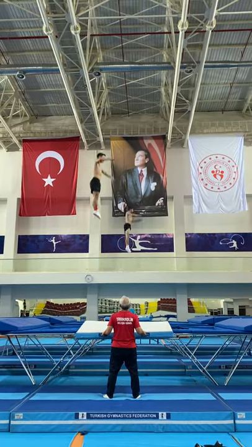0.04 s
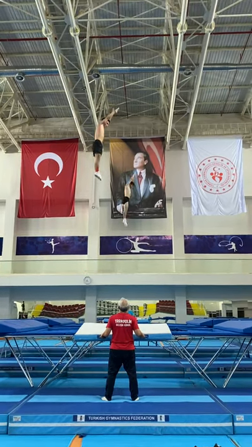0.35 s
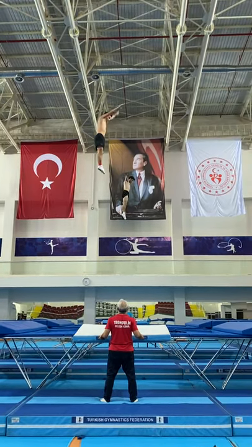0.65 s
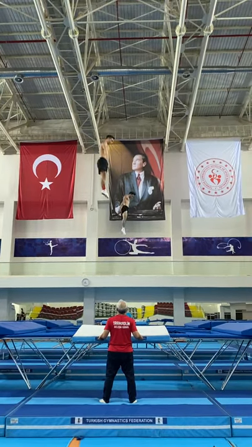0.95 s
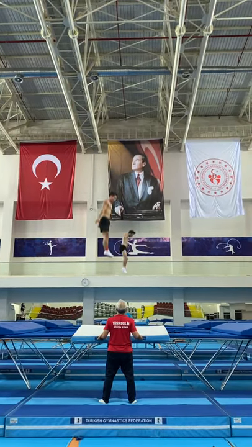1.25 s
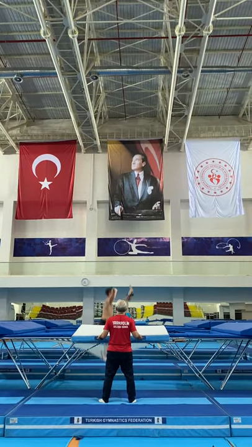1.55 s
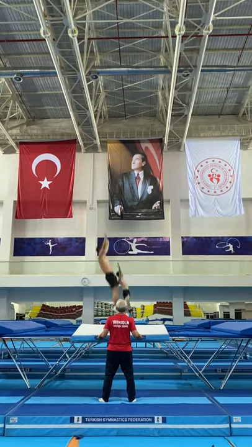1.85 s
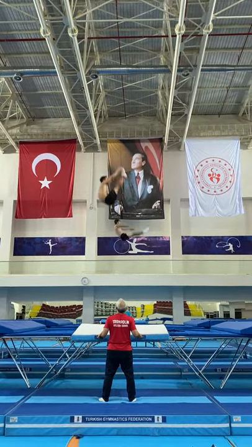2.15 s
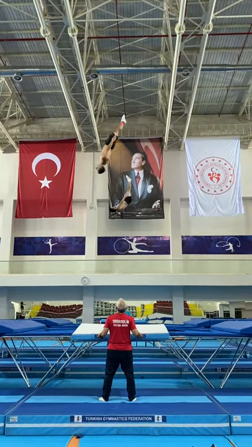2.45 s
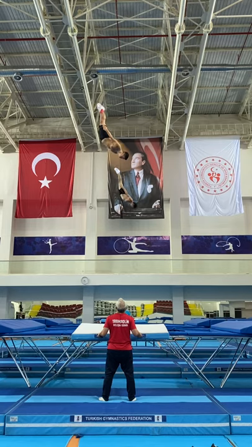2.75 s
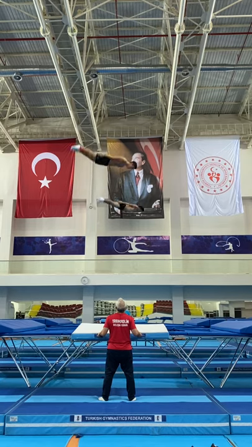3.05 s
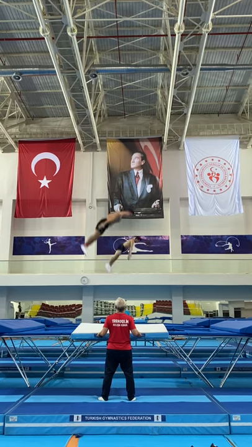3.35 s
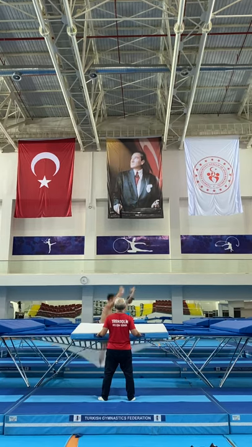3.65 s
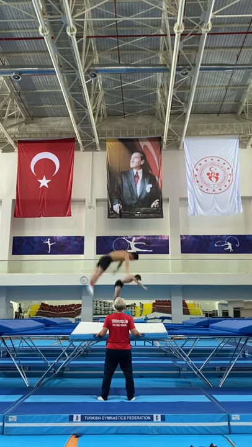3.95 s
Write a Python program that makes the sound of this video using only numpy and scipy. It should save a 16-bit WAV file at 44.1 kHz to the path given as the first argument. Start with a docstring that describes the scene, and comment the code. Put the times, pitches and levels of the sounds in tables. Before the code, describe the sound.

Deep trampoline bounces come about every two seconds, each with dull foot slaps, swishing mesh and jingling springs, while the frame knocks and rings. A large sports hall, heard from a few metres off, echoes over its own steady rumble.

```python
"""Two trampolines in a big sports hall: gymnasts land on them almost together, about every two seconds.
Feet slap down, and each mesh bed thumps, rumbles and swishes through the air. The steel springs creak,
jingle and clank against the frame, which knocks and rings. The hall echoes for seconds over its own
steady rumble. It is all heard in stereo from a few metres away."""
import sys
import numpy as np
from scipy import signal
from scipy.fft import rfft, irfft
from scipy.io import wavfile
from scipy.ndimage import uniform_filter1d

SR = 44100
rng = np.random.default_rng(int(sys.argv[2]) if len(sys.argv) > 2 else 0)


def int16_out(signal):
    """Quantize to a 16-bit WAV file."""
    q = np.round(np.clip(np.atleast_2d(signal).T, -1, 1) * 32767)
    wavfile.write(sys.argv[1], SR, q.astype(np.int16))


N = 176400
LEAD_S = 1  # start early, so the hall is already echoing at time zero
M = N + LEAD_S * SR
T = np.arange(M) / SR - LEAD_S
HZ = np.maximum(np.arange(M // 2 + 1) * SR / M, 1)

# Each landing on a bed: start_s, rumble_db, swish_db, springs_db, contact_s
LANDINGS = [(-.25, -1, -1, -8, 0.38), (1.466, -21, -6.5, -10, 0.33), (1.71, 1, -1.5, -1.5, 0.37),
            (3.59, -24, -11.5, -10.5, 0.41), (3.806, -1, 0, -0.5, 0.41)]


def amp(db):
    """Turn decibels into a number to multiply by."""
    return 10 ** (np.asarray(db) / 20)


def unit(x):
    """Scale a signal to an average (rms) level of 1."""
    return x / np.sqrt(np.mean(x ** 2))


def look_up(table, hz):
    """Find a table's value at any pitch by joining its points on a log scale."""
    pitches, values = np.array(table, float).T
    return np.interp(np.log(hz), np.log(np.maximum(pitches, 1)), values)


def colour(x, tone):
    """Shape a signal's bass and treble with a table, then scale it to level 1."""
    return unit(irfft(rfft(x) * amp(look_up(tone, HZ)), M))


def noise():
    """An even hiss: white noise."""
    return rng.standard_normal(M)


def grains(per_s, spread_db):
    """Tiny random clicks of uneven size."""
    clicks = (rng.random(M) < per_s / SR) * np.sign(noise())
    return clicks * amp(spread_db * np.minimum(rng.exponential(size=M), 4))


def wander(per_s):
    """A random drift, about 1 in size, that heads somewhere new per_s times a second."""
    hold = SR // per_s
    steps = np.repeat(rng.standard_normal(M // hold + 1), hold)
    return unit(uniform_filter1d(steps, hold)[:M])


def press(start_s, rise_s, length_s, fade_s):
    """Loudness of a push: it rises, holds until length_s after its start, then fades."""
    age = T - start_s
    return np.clip(age / rise_s, 0, 1) * np.exp(-np.maximum(age - length_s, 0) / fade_s)


def bounce(start_s, rise_s, contact_s, fade_s, wobble_db):
    """Motion of a bed: the landing, then a weaker swing once the feet have left."""
    wobble = amp(wobble_db) * press(start_s + 0.574, rise_s, length_s=0.2, fade_s=fade_s)
    return np.hypot(press(start_s, rise_s, contact_s, fade_s), wobble)


def soft_hit(start_s, rise_s):
    """Loudness of a padded hit: a rounded bump that peaks after rise_s."""
    age = np.maximum(T - start_s, 0) / rise_s
    return age * np.exp(1 - age)


def hard_hit(start_s, fade_s, rise_s=0.0018):
    """Loudness of a hard hit: a steep edge, then a steady fall."""
    return press(start_s, rise_s, rise_s, fade_s)


def ring(x, notes, detune):
    """Shake three slightly mistuned steel parts with x. A note takes ring_s to fall by 60 dB."""
    t = np.arange(SR) / SR
    response = 0
    for hz, db, ring_s in notes:
        pitches = hz * (1 + detune * rng.standard_normal(size=(3, 1)))
        tones = np.sin(2 * np.pi * pitches * t).sum(0)
        response += amp(db) / np.sqrt(ring_s) * tones * np.exp(-np.log(1000) * t / ring_s)
    return unit(signal.fftconvolve(x, response)[:M]) * np.std(x)


def room_noise():
    """The big room rumbles and hisses all the time, swelling a little."""
    # Tone of the room: pitch_hz, level_db
    tone = [(20, -53), (35, -4), (52, 7.5), (80, 4), (112, -7.5), (200, -1.5), (330, -6.5), (500, -9.5),
            (1000, -18.5), (2000, -28.5), (3200, -29.5), (4800, -37), (7300, -43), (10500, -48.5),
            (15500, -58)]
    return amp(-41.5 + 1.08 * wander(per_s=5)) * colour(noise(), tone)


def bed_rumble():
    """The loaded bed shudders at its own low notes; the deepest build up last."""
    # Low notes of bed and frame: pitch_hz, width_hz, level_db
    notes = [(59.2, 6.9, 8.5), (78.7, 13.7, 10.5), (87.6, 11.3, 6), (164.5, 21.3, 2), (202.7, 31, 3.5),
             (257, 53.3, 1), (359.5, 73.4, -7.5), (493, 110, -19)]
    lowest_hz = notes[0][0]
    out, power = 0, 0
    for hz, width_hz, db in notes:
        rise_s = 0.19 * (lowest_hz / hz) ** 0.37
        motion = sum(amp(level_db) * bounce(start_s, rise_s, contact_s, fade_s=0.13, wobble_db=-11.5)
                     for start_s, level_db, _, _, contact_s in LANDINGS)
        off_pitch = (HZ / hz - hz / HZ) * hz / (2 * width_hz)
        clicks = rfft(grains(per_s=900, spread_db=0.39))
        shudder = amp(db) * irfft(clicks / (1 + 1j * off_pitch) ** 2, M)  # keeps pitches near the note
        out += motion * shudder
        power += np.var(shudder)
    return amp(-29) * out / np.sqrt(power)


def mesh_swish():
    """Air rushes through the moving mesh with a fluttering hiss."""
    # Tone of the rushing air: pitch_hz, level_db
    tone = [(200, 12), (500, 3.5), (900, -0.5), (1400, -3), (1900, -4.5), (2700, -3), (3400, -8.5),
            (5000, -15.5), (7000, -23), (10000, -25.5), (15000, -54)]
    rise_s, flutter_db = 0.05, 3
    motion = sum(amp(db) * bounce(start_s, rise_s, contact_s, fade_s=0.13, wobble_db=-11)
                 for start_s, _, db, _, contact_s in LANDINGS)
    return amp(-41.5 + flutter_db * wander(per_s=30)) * motion * colour(noise(), tone)


def spring_creaks():
    """Springs creak in their hooks and ring, as they stretch and again as they pull back."""
    # Faint rustles of the springs between landings: start_s, level_db, length_s
    rustles = [(0.83, -23, .07), (1.287, -21, 0.16), (2.37, -13, 0.26), (2.96, -34, .06),
               (3.128, -24, 0.91)]
    # Tone of the rubbing hooks: pitch_hz, level_db
    tone = [(1500, -92), (3500, -0.5), (5100, -0.5), (6200, 3.5), (7400, 3.5), (8800, -3), (10300, -2),
            (12000, -4), (13500, -12), (15500, -12.5)]
    # Notes of the springs: pitch_hz, level_db, ring_s
    notes = [(1915, -1, .4), (3129, -7, .3), (3757, 0, .3), (4360, -3, .3), (4705, -3, .35), (4795, -4, .3),
             (4950, -6, .2), (5243, -4, .25), (5444, -3, .3), (5814, -5, .3), (9231, -5, .6),
             (9490, -5, .5), (10051, -3, .5), (10144, 0, .6), (10560, -3, .5)]
    rise_s, dip_db, dip_s = 0.04, -4.5, 0.022
    motion = sum(amp(db) * press(start_s, rise_s, length_s, fade_s=0.1)
                 for start_s, db, length_s in rustles)
    for start_s, _, _, db, contact_s in LANDINGS:
        # The springs go quieter as the bed turns at its lowest point.
        turn = np.exp(-((T - start_s - 0.33 * contact_s) / dip_s) ** 2)
        stretch = bounce(start_s, rise_s, 0.65 * contact_s, fade_s=0.14, wobble_db=-22.5)
        motion = np.hypot(motion, amp(db + dip_db * turn) * stretch)
    flicker = amp(0.93 * wander(per_s=16))
    creak = motion * flicker * colour(grains(per_s=3500, spread_db=2.5), tone)
    return amp(-44) * (creak + amp(-14) * ring(creak, notes, detune=0.0018))


def foot_slaps():
    """Feet and pads slap down with short, dull cracks."""
    # Each slap: start_s, level_db
    hits = [(0.051, -5), (.12, -8), (.165, -6.5), (0.214, -11.5), (1.451, -5), (1.626, -6), (1.703, 0.5),
            (1.723, 0), (1.807, -5), (1.887, -6), (1.923, -1), (2.003, -15), (2.02, -7), (3.566, -4.5),
            (3.816, -3), (3.835, -1), (3.844, -1), (3.866, -1)]
    # Tone of a slap: pitch_hz, level_db
    tone = [(200, 9.5), (700, -1.5), (1300, 0), (1900, -1), (2350, -3), (2750, -13), (3500, -22),
            (5000, -11), (8000, -24.5), (15000, -25)]
    loudness = sum(amp(db) * soft_hit(start_s, rise_s=0.004) for start_s, db in hits)
    return amp(-36.5) * loudness * colour(noise(), tone)


def bed_thumps():
    """The bed snaps tight: a brief low note that starts high and sags as the mesh gives."""
    # Each thump: start_s, level_db, pitch_hz
    hits = [(0.078, -31, 96), (.116, -26.5, 190), (1.736, -17.5, 198), (1.85, -18, 171),
            (1.906, -23.5, 320), (1.928, -21, 184), (1.946, -18, 91), (2.047, -21, 100),
            (2.096, -19.5, 214), (3.846, -21.5, 243), (3.856, -21.5, 93), (3.875, -23, 175),
            (3.942, -24, 177), (3.961, -18, 130)]
    sag_share, sag_s = 0.24, 0.0078
    out = 0
    for start_s, db, hz in hits:
        age = np.maximum(T - start_s, 0)
        cycles = hz * (age + sag_share * sag_s * (1 - np.exp(-age / sag_s)))
        out += amp(db) * soft_hit(start_s, rise_s=0.0042) * np.sin(2 * np.pi * cycles)
    return out


def frame_knocks():
    """The frame and its pads give dull knocks."""
    # Each knock: start_s, level_db
    hits = [(.297, -41), (.853, -37.5), (0.959, -44.5), (1.628, -40.5), (1.903, -30.5), (1.927, -32),
            (2.021, -37), (3.142, -36.5)]
    # Tone of a knock: pitch_hz, level_db
    tone = [(150, -11), (500, 12), (800, 8.5), (1200, 3), (3000, -17), (12000, -30)]
    loudness = sum(amp(db) * soft_hit(start_s, rise_s=0.0019) for start_s, db in hits)
    return loudness * colour(noise(), tone)


def hook_clanks():
    """Hooks snap against the frame, rattle and leave its tubes ringing."""
    # Each clank: start_s, level_db, fade_s
    hits = [(0.329, -28, 0.014), (0.852, -23, 0.0082), (1.453, -11, 0.015), (1.621, -4.5, 0.0075),
            (1.628, 0, 0.017), (1.701, -7, .01), (2.628, -24, 0.056), (3.141, -24, .003),
            (3.565, -14.5, 0.019), (3.604, -16, 0.1), (3.814, -9, .015), (3.843, 0, 0.0036),
            (3.869, -4, 0.011), (3.882, -3, 0.0061)]
    # Tone of the rattle: pitch_hz, level_db
    tone = [(600, -23), (1300, -5.5), (1900, 1), (2800, -1), (3800, -4), (4300, 1.5), (4950, 1.5),
            (5800, 0), (7300, 8), (10000, -14), (12500, -7), (15500, -21)]
    # Notes of the frame tubes: pitch_hz, level_db, ring_s
    notes = [(1846, -10, 0.38), (2261, 3, 0.37), (2690, -9, 0.16), (3930, 0, 0.56), (4660, -7, .25),
             (5080, -5, 0.26), (5380, -11, .15), (5560, -8, .15)]
    loudness = sum(amp(db) * hard_hit(start_s, fade_s) for start_s, db, fade_s in hits)
    rattle = loudness * colour(grains(per_s=9000, spread_db=1.5), tone)
    return amp(-35.5) * (rattle + amp(-10) * ring(rattle, notes, detune=0.008))


def spring_pings():
    """A plucked spring sings out briefly, its note made rough by the chattering hook."""
    # Each ping: start_s, pitch_hz, level_db, ring_s
    plucks = [(.93, 5900, -63, .35), (1.628, 1774, -42.5, 0.25), (1.628, 3780, -44, 0.44),
              (1.627, 4950, -38, 0.097), (1.698, 5150, -52, .12), (1.726, 1650, -40.5, .07),
              (1.808, 2270, -42, .09), (1.886, 1890, -42, .08), (3.835, 2017, -37, 0.059),
              (3.843, 1756, -38, .05), (3.841, 4780, -40.5, 0.065), (3.872, 5250, -45, 0.28),
              (3.876, 4340, -54, .12)]
    out = 0
    for start_s, hz, db, ring_s in plucks:
        rough_hz = hz * (1 + 0.014 * wander(per_s=300))
        loudness = amp(db) * hard_hit(start_s, fade_s=ring_s / np.log(1000))
        out += loudness * np.sin(2 * np.pi * np.cumsum(rough_hz) / SR)
    return out


def squeak():
    """One faint, thin note that wavers and sags a little."""
    start_s, pitch_hz, sag_hz_per_s = 1, 4700, 290
    hz = pitch_hz - sag_hz_per_s * (T - start_s) + 12 * wander(per_s=40)
    loudness = amp(-71) * press(start_s, rise_s=0.04, length_s=0.24, fade_s=0.046)
    return loudness * np.sin(2 * np.pi * np.cumsum(hz) / SR)


def near_echoes(x):
    """Sound bounces off the floor and frames close by for a few milliseconds."""
    length, fade_s = SR // 10, 0.0026
    burst = noise()[:length] * np.exp(-np.arange(length) / SR / fade_s)
    return amp(-3.5) * signal.fftconvolve(x, burst / np.linalg.norm(burst))[:M]


def hall_echo(x):
    """The hall smears sound into a long echo; the middle pitches last longest."""
    # Time the echo takes to fall by 60 dB: pitch_hz, ring_s
    ring_times = [(60, 1.1), (250, 2.89), (700, 6.1), (2000, 6.24), (4000, 3.6), (8000, 1.33), (15000, 1.5)]
    t = np.arange(M) / SR
    hiss = rfft(noise())
    bands_hz = np.geomspace(50, 16000, 12)
    tail = 0
    for share, hz in zip(np.eye(len(bands_hz)), bands_hz):
        band = irfft(hiss * np.interp(np.log(HZ), np.log(bands_hz), share), M)
        tail += band * np.exp(-np.log(1000) * t / look_up(ring_times, hz))
    build_s = 0.058
    fade_in = np.clip(t / build_s - 0.5, 0, 1)  # a short gap, then the echo builds
    return signal.fftconvolve(x, tail * fade_in / np.sqrt(SR / 5))[:M]


def scene():
    """The trampolines are straight ahead; echoes and room noise spread to the left and right."""
    # Strength of the stereo spread: pitch_hz, level_db
    width = [(55, -66), (130, -43), (290, -18.5), (640, -6), (1800, -7.5), (3200, -3), (5200, -5.5),
             (7300, -29.5), (8800, 2), (10300, -17), (12000, -11), (15500, -12)]
    # How far the left channel's wave runs ahead of the right: pitch_hz, lead_radians
    left_lead = [(0, 0), (1810, 0.0), (2500, 0.8), (5250, 0.5), (6980, 3.1), (8010, 3.2), (8350, 4.1),
                 (9470, 5.4), (9730, 6.2), (11600, 6.5), (12500, 9.4), (14400, 9.4), (15500, 12.4),
                 (16700, 12.7)]
    # Each sound, and how strongly it feeds the hall's echo: sound, echo_db
    parts = [(bed_rumble(), 3), (mesh_swish(), 0.5), (spring_creaks(), 0), (bed_thumps(), -9.5),
             (foot_slaps() + frame_knocks(), -4), (hook_clanks() + squeak(), 3), (spring_pings(), -8.5)]
    direct = sum(sound for sound, _ in parts)
    to_hall = sum(amp(echo_db) * sound for sound, echo_db in parts)
    middle = rfft(direct + hall_echo(to_hall) + room_noise())
    side = rfft(near_echoes(direct) + hall_echo(to_hall) + room_noise()) * amp(look_up(width, HZ))
    left_right = np.array([[1], [-1]])
    shift = np.exp(0.5j * left_right * look_up(left_lead, HZ))
    return irfft((middle + left_right * side) * shift, M)[:, -N:]


def record(dry):
    """A phone's microphones lose the very highest treble."""
    top_hz = 15750
    return signal.sosfilt(signal.ellip(8, 0.2, 70, top_hz, fs=SR, output="sos"), dry)


dry = scene()
out = record(dry)
int16_out(out)
```